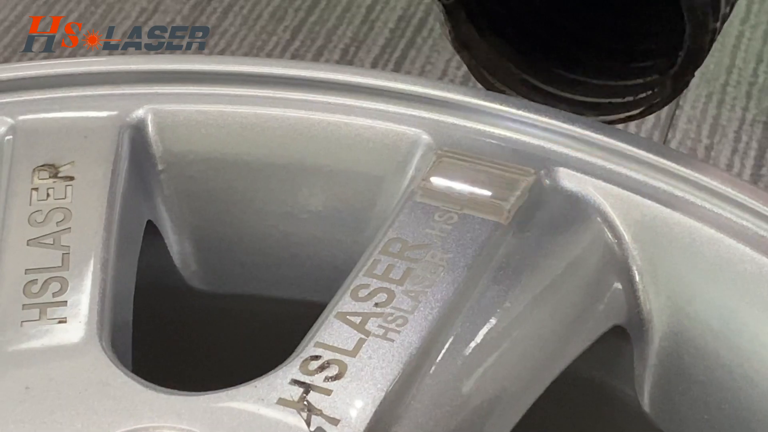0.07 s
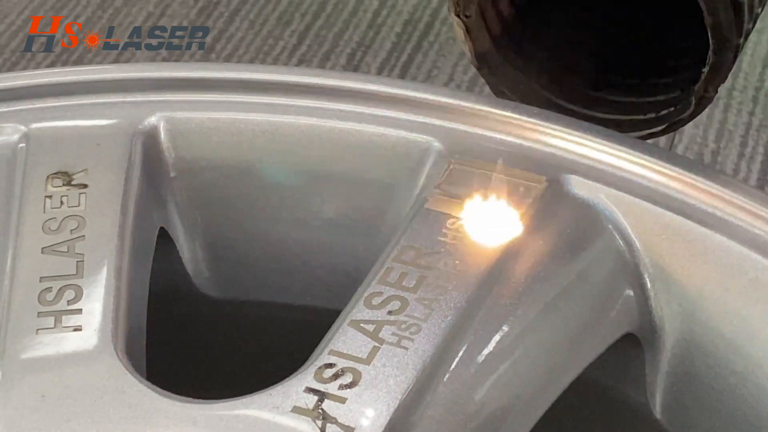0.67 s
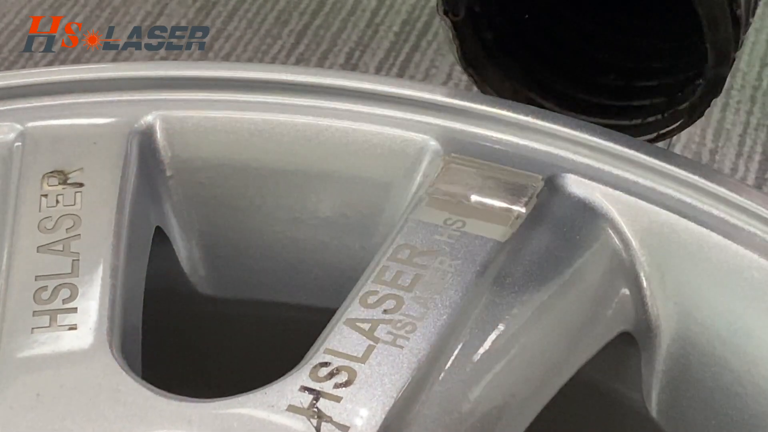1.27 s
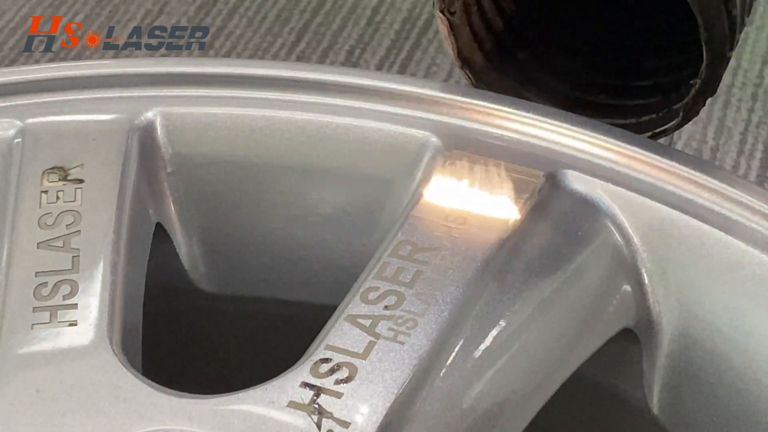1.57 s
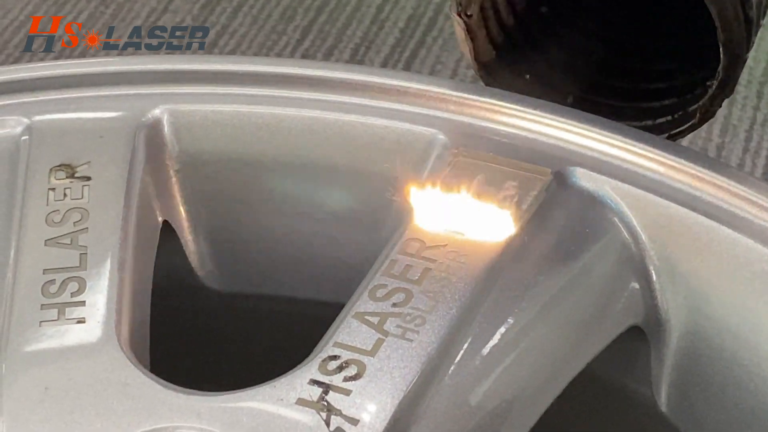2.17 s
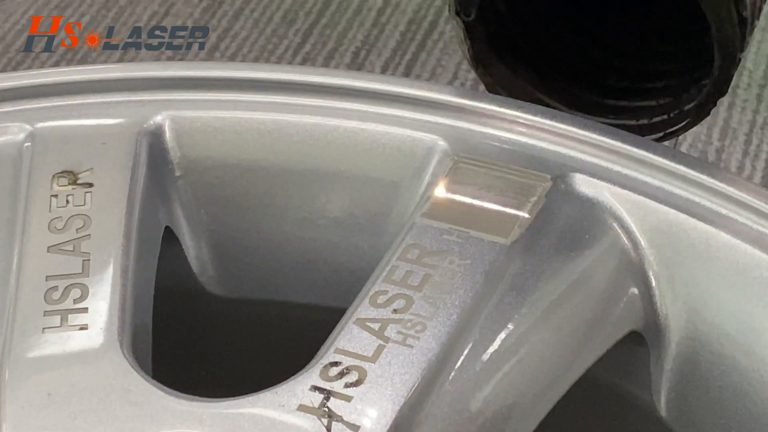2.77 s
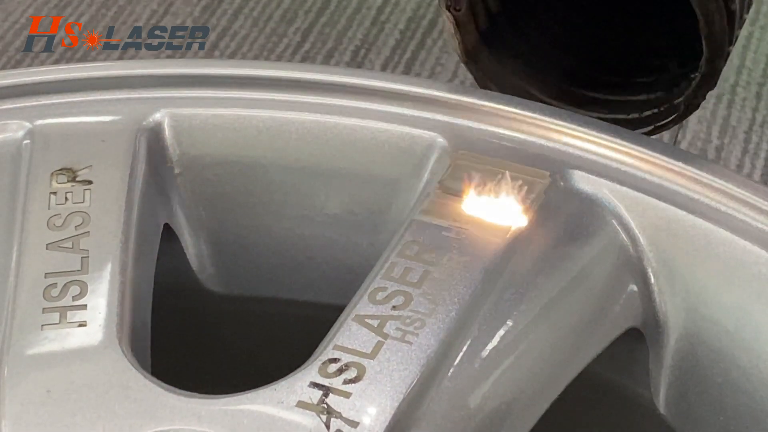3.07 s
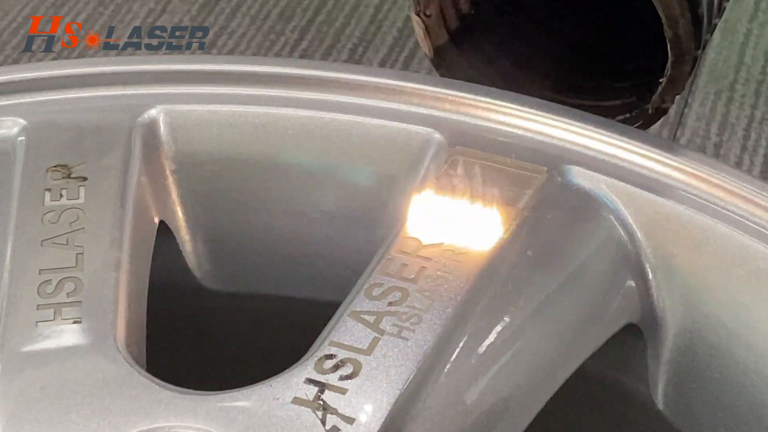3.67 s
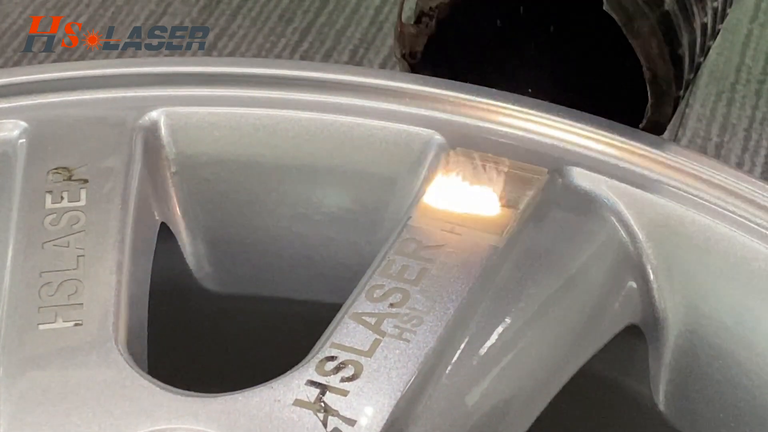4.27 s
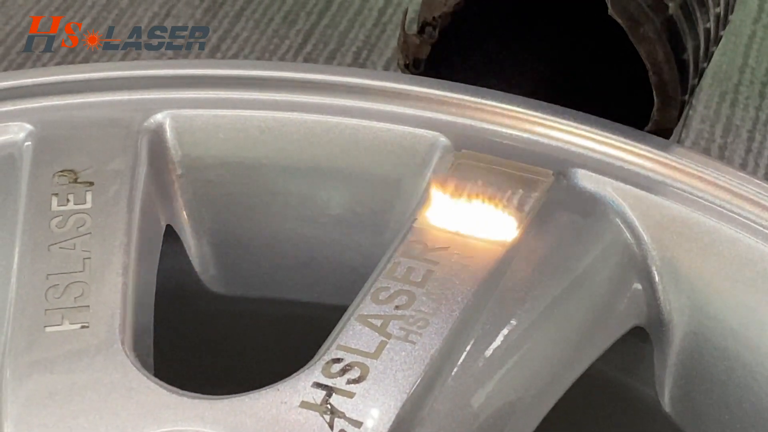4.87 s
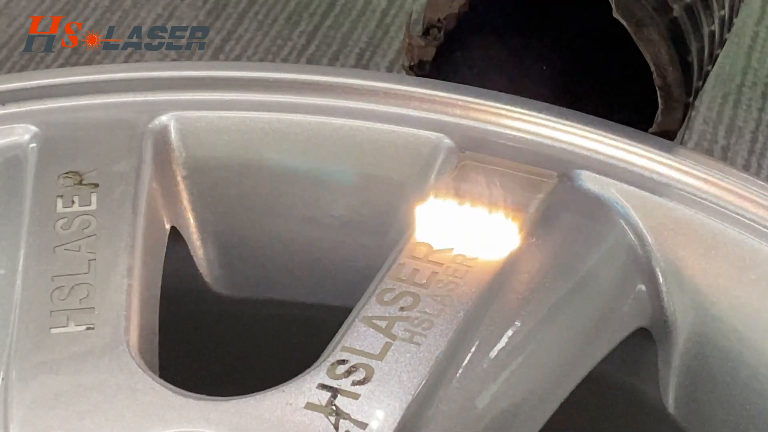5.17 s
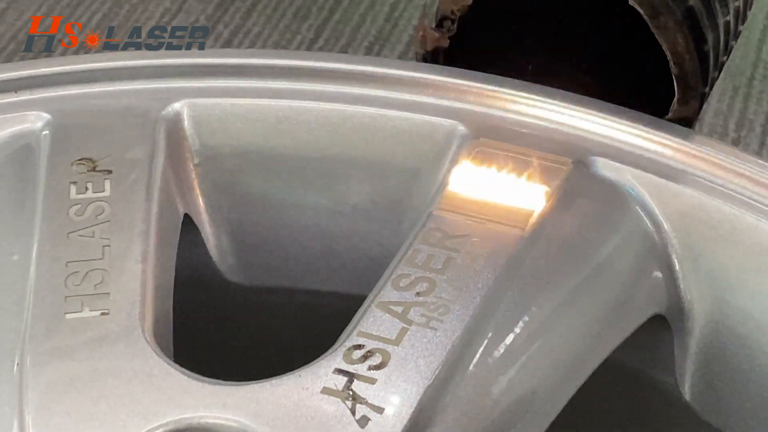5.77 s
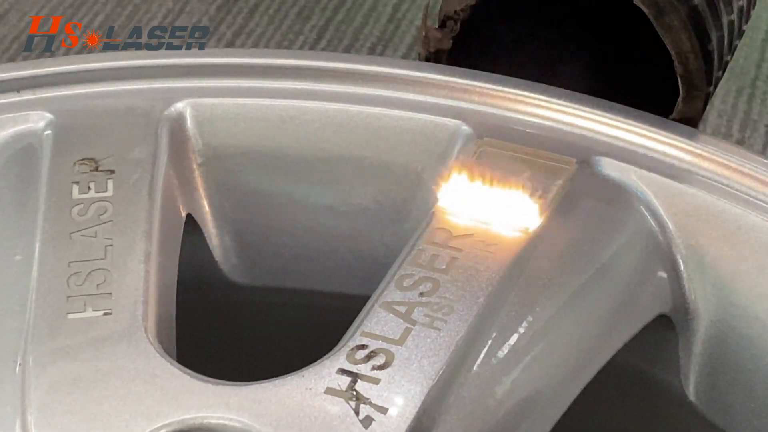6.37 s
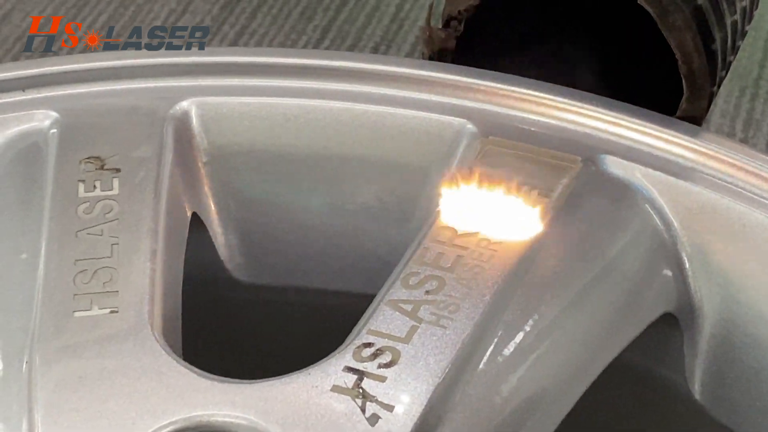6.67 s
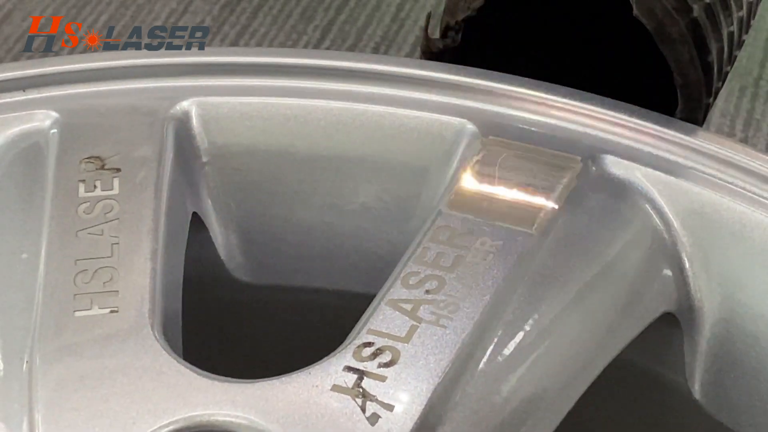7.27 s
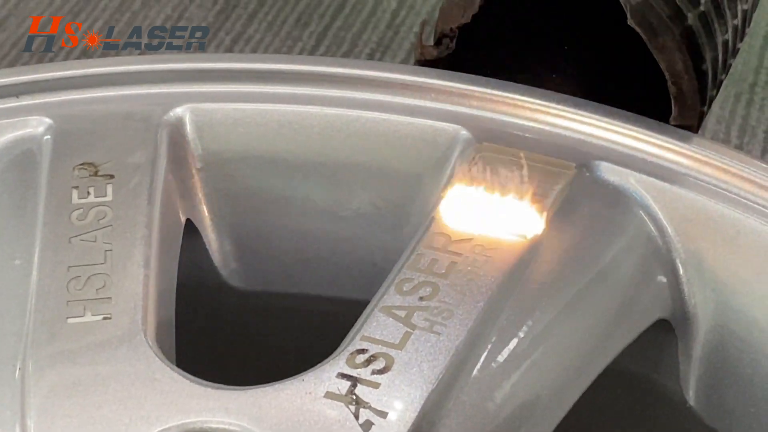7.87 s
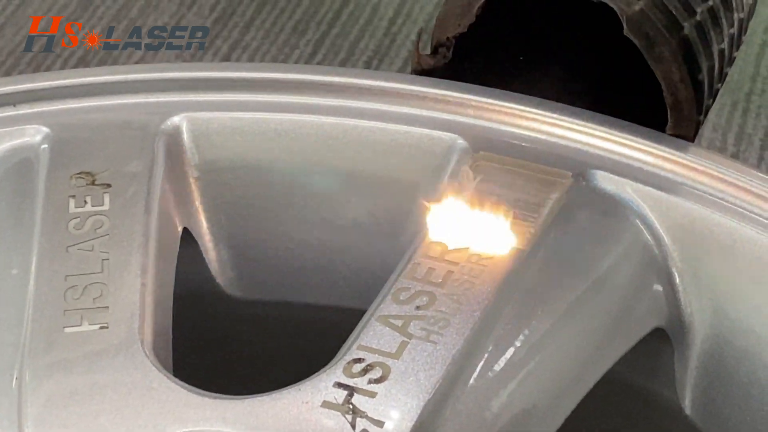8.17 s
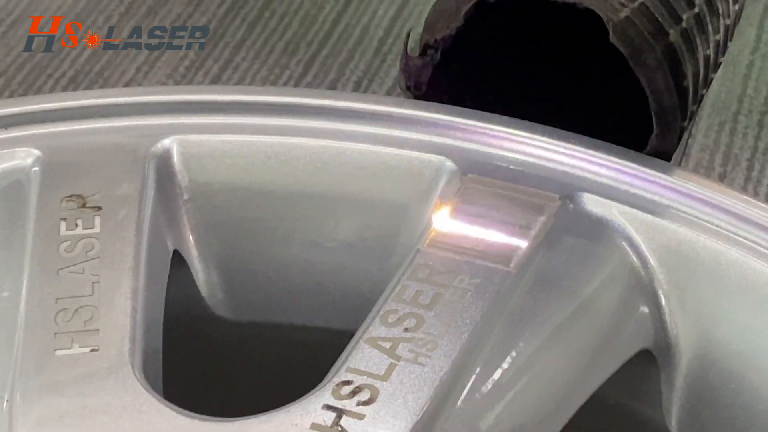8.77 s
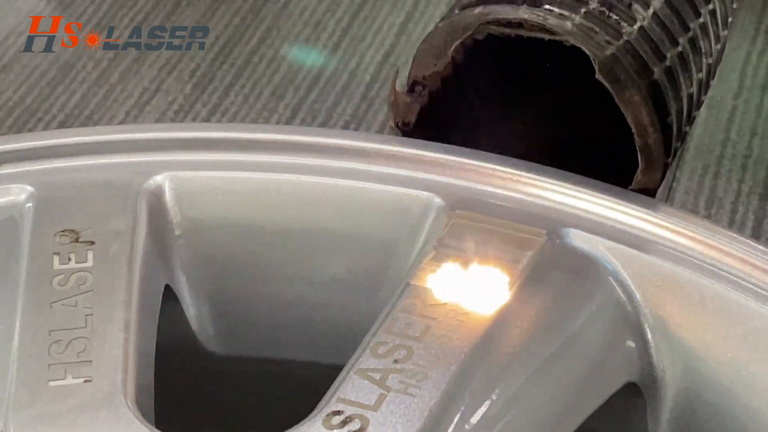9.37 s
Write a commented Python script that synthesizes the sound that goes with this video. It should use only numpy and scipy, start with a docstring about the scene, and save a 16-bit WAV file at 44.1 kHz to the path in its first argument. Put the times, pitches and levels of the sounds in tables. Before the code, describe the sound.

A pulsed laser grazes an alloy wheel spoke with thin, buzzing ticks, then bites into the coating with a harsh, gritty sizzle. It makes seven passes of about a second each, separated by quieter gaps with rapid ticking. Flakes snap off and small flares add low, fluttering puffs. The sound is close, in a workshop, with a fume extractor rushing faintly throughout.

```python
"""Buzzing ticks first: a pulsed laser grazes the edge of an alloy wheel spoke, close by in a workshop.
Then it bites and strips the coating in seven passes. A mirror swings the beam to and fro; each
crossing is a short burst of sizzle, so the passes buzz. Flakes pop, flares of the plume throb low,
a brief drone follows the fourth pass. A fume extractor runs behind."""
import sys
import numpy as np
from scipy import signal
from scipy.fft import rfft, irfft, next_fast_len
from scipy.io import wavfile
from scipy.ndimage import uniform_filter1d

SR = 44100
rng = np.random.default_rng(int(sys.argv[2]) if len(sys.argv) > 2 else 0)


def log_audio(samples):
    """Write samples as a 16-bit WAV file to the path given in sys.argv[1]."""
    # one column per channel
    frames = np.atleast_2d(samples).T
    # limit to full scale, then quantise
    limited = np.clip(frames, -1, 1)
    pcm = np.round(limited * 32767).astype(np.int16)
    wavfile.write(sys.argv[1], SR, pcm)


N = 415422
TIME_S = np.arange(N) / SR
SCAN_HZ = 54.03
ROAR_STRETCH, RUMBLE_STRETCH = 1.09, 1.01  # length relative to the throb

# Table levels are relative: filters and mix gains follow.
# spectra (frequency [Hz], level [dB])
EXTRACTOR_SPECTRUM = [(40, -50), (120, -26), (175, -13.5), (235, -32), (295, -3), (450, -9.5), (600, -3.5),
                      (900, 1.5), (1500, -14.5), (2300, -4.5), (3200, -17.5), (4500, -19.5), (10000, -18.5),
                      (15500, -22)]
TICK_SPECTRUM = [(100, -57), (220, -6), (400, 3.5), (900, -2), (1500, -5.5), (2500, -0.5), (3000, -6.5),
                 (3700, -2.5), (4600, -3.5), (8000, 2.5), (11500, 0), (14300, 9.5), (15800, 5)]
SIZZLE_SPECTRUM = [(120, -71), (300, -39.5), (900, 1), (1500, 1.5), (2200, 2), (3200, 2), (5000, 1),
                   (7500, 1), (9000, 7.5), (11500, -1.5), (14000, -1), (15500, 1)]
PUFF_SPECTRUM = [(100, -44), (210, -33.5), (320, -3), (430, -2), (600, 1.5), (900, -1.5), (1400, -8),
                 (2200, -8.5), (5000, -32)]
SPRAY_SPECTRUM = [(200, -54), (5000, -15), (8000, -9), (9200, -6), (10100, 1), (11000, -13), (12200, -23),
                  (14300, -10.5), (16000, -18)]
# stereo width of diffuse sound (frequency [Hz], side gain [dB])
SIDE_SPECTRUM = [(100, -4), (300, -2.5), (700, -11.5), (1300, -3), (2400, -24), (4500, -21), (8000, -13),
                 (15000, -24.5)]
# phase between the microphone ports (frequency [Hz], right lead [turns])
PORT_PHASE = [(0, 0), (7100, 0), (8500, .5), (12100, 1.5), (15900, 2.5)]
# drone envelope (time [s], level [dB])
DRONE_ENVELOPE = [(5.33, -73), (5.39, -70), (5.48, -61), (5.56, -62.5), (5.67, -53), (5.74, -59),
                  (5.8, -87)]
# mirror restarts, one per pass (time [s])
PASS_STARTS_S = [-.0139, 1.3168, 2.6290, 4.0339, 5.4755, 6.9357, 8.4331]
# beam on one edge (start [s], end [s], side [+-1], first level [dB], last level [dB], ring share [0-1])
EDGE_GRAZES = [(0, 0.37, 1, -57.5, -57.5, 0.66), (1.33, 1.45, 1, -66.5, -76, 0.3),
               (1.44, 1.496, 1, -55.5, -52, 0.14), (2.622, 2.757, 1, -81, -72, 0.02),
               (2.77, 2.845, 1, -65, -55, 0.1), (4.041, 4.107, -1, -64, -51.5, 0.23),
               (5.49, 5.585, -1, -65, -68, 0), (5.592, 5.712, -1, -62, -51, 0.23),
               (6.933, 7.112, 1, -73.5, -72, 0), (7.104, 7.448, 1, -61, -51.5, 0.1),
               (8.449, 8.573, -1, -68.5, -69, 0.1), (8.575, 8.913, -1, -56, -53.5, 0.23)]
# plume flares (time [s], half length [s], throb pitch [Hz], throb level [dB],
# roar pitch [Hz], roar level [dB], rumble level [dB])
PLUME_FLARES = [(0.371, 0.0062, 60, -35, 326, -49, -52), (0.477, 0.09, 314, -41, 495, -50, -64),
                (0.587, 0.054, 104, -46, 322, -52, -54), (1.556, 0.061, 253, -50, 330, -55, -59),
                (1.845, 0.21, 173, -65.5, 333, -85, -77), (1.982, 0.054, 87, -48.5, 373, -56, -55),
                (2.096, 0.085, 359, -58.5, 500, -50.5, -96), (2.922, 0.031, 200, -42, 344, -47, -70),
                (2.954, 0.051, 84, -49, 330, -67, -54), (3.16, 0.18, 186, -75.5, 328, -64.5, -71),
                (4.208, 0.038, 193, -50, 330, -72, -83), (4.44, 0.097, 224, -42, 345, -58, -62),
                (4.885, 0.065, 61, -53, 330, -85, -66), (5.063, 0.043, 65.4, -58, 330, -86, -80),
                (5.331, 0.057, 217, -34.5, 320, -49.5, -81), (5.79, 0.038, 75, -70, 614, -53, -61),
                (6.014, 0.04, 228, -60.5, 330, -72, -87), (6.08, 0.06, 115, -61, 330, -67, -70),
                (6.773, 0.11, 204, -51, 320, -49.5, -49), (7.622, 0.064, 101, -38.5, 175, -54.5, -43.5),
                (7.78, 0.1, 318, -48, 400, -48, -65), (8.126, 0.09, 159, -38, 323, -47.5, -41),
                (8.222, 0.076, 346, -44.5, 530, -47.5, -70), (9.317, 0.039, 183, -51, 425, -50, -76)]
# flakes bursting off (time [s], level [dB])
FLAKE_POPS = [(0.366, -22), (0.372, -21), (1.462, -27.5), (1.508, -27), (2.844, -28), (2.988, -22),
              (3.025, -31), (3.062, -31), (3.329, -31), (5.715, -17), (5.733, -18.5), (7.368, -23),
              (8.894, -28), (8.913, -23.5)]
# passing resonances of the burn (time [s], half length [s], centre [Hz], level [dB])
BURN_RASPS = [(0.462, 0.11, 3720, -46.5), (0.833, 0.04, 665, -60), (1.654, 0.14, 3780, -47.5),
              (2.28, 0.12, 4570, -50), (3.503, 0.25, 4200, -53.5), (4.542, 0.067, 1030, -53.5),
              (4.53, 0.15, 2000, -53.5), (5.013, 0.32, 5050, -49.5), (5.8, 0.053, 3050, -51.5),
              (6.135, 0.24, 990, -58.5), (7.845, 0.18, 2170, -55), (7.95, 0.3, 14800, -55),
              (9.23, 0.28, 14800, -47), (9.25, 0.097, 4570, -48.5)]
# beam biting the coating (start [s], end [s], attack [s], sizzle level [dB], sizzle trend [dB/s],
# puff level [dB], built-up spray level [dB])
COATING_BURNS = [(0.35, 0.376, 0.043, -44.5, 0, -45, -56), (0.399, 1.021, 0.05, -48.5, -4, -49.5, -53.5),
                 (1.459, 1.475, .014, -57, 0, -56, -57), (1.499, 2.472, .01, -49.5, -5, -54.5, -52.5),
                 (2.84, 3.922, 0.015, -52.5, 1.5, -52.5, -54.5), (4.099, 5.373, 0.024, -51, 1, -54.5, -52),
                 (5.7, 6.823, 0.0088, -49.5, -2, -57.5, -50), (7.15, 7.214, 0.041, -57, 6, -61, -48),
                 (7.31, 7.38, 0.031, -57.5, 0, -71, -62), (7.451, 8.274, 0.096, -48.5, 2, -50, -49),
                 (8.906, 8.943, 0.011, -54, 2, -49.5, -50), (8.965, 9.099, .1, -50, -8, -54, -50),
                 (9.131, 9.43, 0.1, -49, -13, -55.5, -45)]


def undb(db):
    """Decibels to gain."""
    return 10 ** (np.asarray(db) / 20)


def unit(x):
    """Scale to rms 1."""
    return x / np.sqrt(np.mean(x ** 2) + 1e-20)


def colour(x, points):
    """Minimum-phase filter through points (frequency [Hz], gain [dB])."""
    size = next_fast_len(x.shape[-1] + 8192)
    size += size % 2
    hz, db = np.transpose(points)
    log_gain = np.log(undb(np.interp(np.log(np.fft.rfftfreq(size, 1 / SR) + 1), np.log(hz), db)))
    cepstrum = irfft(log_gain)
    cepstrum[1:size // 2] *= 2
    cepstrum[size // 2 + 1:] = 0
    return irfft(rfft(x, size) * np.exp(rfft(cepstrum)))[..., :x.shape[-1]]


def walk(rate_hz):
    """Random values joined by lines, rms near 1."""
    knots = rng.standard_normal(int(N / SR * rate_hz) + 2)
    return np.interp(TIME_S * rate_hz, np.arange(len(knots)), knots) * np.sqrt(3 / 2)


def spread(mid, side):
    """Left and right of a diffuse sound."""
    return mid + colour(side, SIDE_SPECTRUM) * np.array([[1], [-1]])


def extractor(level_db=-68):
    """Steady rush of the fume hose, wavering a little."""
    mid, side = (unit(colour(rng.standard_normal(N), EXTRACTOR_SPECTRUM)) for _ in range(2))
    return spread(mid, undb(-5) * side) * undb(level_db + .5 * walk(8.5))


def drone():
    """Fluttering low tone: narrow noise near 205 Hz."""
    times_s, db = np.transpose(DRONE_ENVELOPE)
    spectrum = [(110, -28), (170, -6), (205, 7.5), (235, 0), (300, -7), (450, -51)]
    tone = unit(colour(rng.standard_normal(N), spectrum))
    return tone * undb(np.interp(TIME_S, times_s, db)) * (TIME_S > times_s[0]) * (TIME_S < times_s[-1])


def workshop(x, wheel_t60_s=0.036, room_t60_s=0.24):
    """Direct sound, quick reflections inside the wheel, faint room tail."""
    age_s = np.arange(SR // 2) / SR
    arrived = age_s > .0004
    response = 0
    for t60_s, db in ((wheel_t60_s, -12), (room_t60_s, -20)):
        echoes = rng.standard_normal((2, len(age_s))) * np.exp(-np.log(1000) * age_s / t60_s) * arrived
        response = response + undb(db) * echoes / np.sqrt(np.sum(echoes[0] ** 2))
    response = colour(response, [(150, -29.5), (500, 2), (3000, 6.5), (7000, 2.5), (10000, 5), (15000, 9)])
    wet = signal.fftconvolve(x[None], signal.hilbert(response), axes=1)[:, :N]
    # the moving spot keeps changing the echo paths
    path_turns = np.array([walk(SCAN_HZ / 2), walk(SCAN_HZ / 2)])
    mid, side = (wet * np.exp(2j * np.pi * path_turns)).real
    return x + spread(mid, undb(12) * side)


def mirror():
    """Beam position across the spoke, -1 to 1."""
    starts_s = np.array(PASS_STARTS_S)
    age_s = TIME_S - starts_s[np.searchsorted(starts_s, TIME_S) - 1]
    return np.sin(2 * np.pi * SCAN_HZ * age_s)


def surface(memory):
    """Noise that partly repeats: each swing meets nearly the same coating."""
    period = round(SR / SCAN_HZ)
    swings = rng.standard_normal((N // period + 1, period))
    return unit(signal.lfilter([1], [1, -memory], swings, axis=0).ravel()[:N])


def bite(start_s, end_s, attack_s, cut_s=.005):
    """Gate of one burn, with linear ramps."""
    return np.clip(np.minimum((TIME_S - start_s) / attack_s, (end_s - TIME_S) / cut_s) + .5, 0, 1)


def burn_gate():
    """Sum of all burn gates."""
    return sum(bite(*burn[:3]) for burn in COATING_BURNS)


def swells(source, table, width_oct):
    """Gaussian swells of a source during burns, each through its own resonance."""
    out, burning = np.zeros(N), burn_gate()
    for time_s, half_s, centre_hz, db in table:
        near = np.abs(TIME_S - time_s) < 3 * half_s
        swell = np.exp(-((TIME_S[near] - time_s) / half_s) ** 2) * burning[near]
        hz = np.fft.rfftfreq(len(swell), 1 / SR) + 1
        sigma_oct = width_oct + 14 / centre_hz  # low resonances are broader
        resonance = np.exp(-.5 * (np.log2(hz / centre_hz) / sigma_oct) ** 2)
        band = irfft(rfft(source[near] * swell) * resonance, len(swell))
        out[near] += undb(db) * unit(band) * np.sqrt(np.mean(swell ** 2))
    return out


def flares(on_spoke, lopsided=0.37, unrest=0.74, sway_db=-7):
    """The flaring plume puffs at each crossing: a throb over a roar and a rumble."""
    ignition = np.maximum(np.gradient(on_spoke), 0) * (1 + lopsided * np.sin(2 * np.pi * SCAN_HZ * TIME_S))
    strength = undb(1.3 * walk(90))
    turbulence = unit(colour(surface(memory=0.83), [(500, -1), (1500, -35)])) * on_spoke
    drive = unit(ignition) * strength + unrest * turbulence
    throbs, roars, rumbles = [], [], []
    rumble_hz = 67
    for time_s, half_s, throb_hz, throb_db, roar_hz, roar_db, rumble_db in PLUME_FLARES:
        throbs.append((time_s, half_s, throb_hz, throb_db))
        roars.append((time_s, half_s * ROAR_STRETCH, roar_hz, roar_db))
        rumbles.append((time_s, half_s * RUMBLE_STRETCH, rumble_hz, rumble_db))
    flame = swells(drive, throbs, width_oct=0.16) + swells(drive, roars, width_oct=0.15)
    flame += swells(turbulence, rumbles, width_oct=0.51)
    sway = undb(sway_db) * walk(14) * signal.hilbert(flame).imag  # the flame leans left and right
    return flame + sway * np.array([[1], [-1]])


def edge_ticks(position, edge=.67, tick_width=0.0047, crackle_width=0.082, return_db=2):
    """Only the rim reacts: the beam ticks going out and, harder, coming back."""
    ticks, ring_share = np.zeros(N), np.zeros(N)
    returning = position * np.gradient(position) < 0
    strength = undb(return_db * returning + 0.74 * walk(110))
    for start_s, end_s, side, first_db, last_db, share in EDGE_GRAZES:
        during = (TIME_S >= start_s) & (TIME_S < end_s)
        from_rim = np.abs(position[during] - side * edge)
        fizz = (.17 * np.exp(-from_rim / crackle_width) + 0.031) * rng.standard_normal(during.sum())
        touch = (np.exp(-from_rim / tick_width) + fizz) * strength[during]
        ticks[during] += unit(touch) * undb(np.linspace(first_db, last_db, during.sum()))
        ring_share[during] = share
    ring_spectrum = [(1500, -11), (2450, -4), (3000, -8), (3450, 9), (3900, 8), (4400, -5), (6000, -16)]
    return colour(ticks, TICK_SPECTRUM) + colour(ticks * ring_share, ring_spectrum)


def pops(decay_s=0.001):
    """Single flakes burst off with a snap."""
    out, age_s = np.zeros(N), np.arange(SR // 100) / SR
    for time_s, db in FLAKE_POPS:
        snap = rng.standard_normal(len(age_s)) * np.exp(-age_s / decay_s)
        out[int(time_s * SR):][:len(age_s)] += undb(db) * snap / np.abs(snap).max()
    spectrum = [(100, -79), (250, 14), (600, 13), (2500, 4.5), (7000, -7), (15000, 0)]
    return undb(-9.5) * colour(out, spectrum)


def burn_gains(puff_db_per_s=-7, flare_puff_db=-3.5, spray_lag_db=-14.5, spray_build_s=0.24):
    """Sizzle follows its trend; puff thins with the coating, swells in flares; spray builds with heat."""
    sizzle, puff, spray, flaring = np.zeros((4, N))
    for start_s, end_s, attack_s, sizzle_db, sizzle_db_per_s, puff_db, spray_db in COATING_BURNS:
        gate = bite(start_s, end_s, attack_s)
        on = gate > 0
        age_s, from_middle_s = TIME_S[on] - start_s, TIME_S[on] - (start_s + end_s) / 2
        sizzle[on] += gate[on] * undb(sizzle_db + sizzle_db_per_s * from_middle_s)
        puff[on] += gate[on] * undb(puff_db + puff_db_per_s * from_middle_s)
        spray[on] += gate[on] * undb(spray_db + spray_lag_db * np.exp(-age_s / spray_build_s))
    for time_s, half_s, *_, roar_db, _ in PLUME_FLARES:
        from_peak = np.minimum(np.abs(TIME_S - time_s) / (half_s * ROAR_STRETCH), 10)
        flaring += undb(roar_db + flare_puff_db) * np.exp(-from_peak ** 2)
    return sizzle, np.hypot(puff, flaring * burn_gate()), spray


def ablation(exposure, afterglow=0.15, patchy_db=1.85):
    """Each crossing boils off coating: gritty sizzle, rasp, plume puff, fine high spray."""
    sizzle_gain, puff_gain, spray_gain = burn_gains()
    burn = (exposure + afterglow) * undb(0.44 * walk(110))
    # thick patches flash at the same place each swing
    patches_db = patchy_db * unit(uniform_filter1d(surface(memory=.995), size=60))
    grit = undb(.5 * patches_db + 1.6 * walk(2500))
    sizzle = unit(colour(surface(memory=0.45) * burn * grit, SIZZLE_SPECTRUM))
    rasp = swells(surface(memory=0.38) * burn * grit, BURN_RASPS, width_oct=0.36)
    puff = unit(colour(surface(memory=0.827) * burn * undb(patches_db), PUFF_SPECTRUM))
    spray = unit(colour(surface(memory=0.086) * burn * undb(2.3 * walk(1800)), SPRAY_SPECTRUM))
    return (undb(3) * sizzle * sizzle_gain + undb(-2.5) * rasp
            + undb(-1.5) * puff * puff_gain + undb(2.5) * spray * spray_gain)


def scene():
    """Scanned beam on the spoke, plume, drone and extractor, in stereo."""
    position = mirror()
    on_spoke = .5 + .5 * np.tanh((.7 - np.abs(position)) / 0.022)
    forward = np.gradient(position) > 0
    imbalance_db = 0.93 * walk(1.923) * (2 * forward - 0.5)  # the two directions bite unequally
    laser = ablation(on_spoke * undb(imbalance_db)) + pops()
    ticks = edge_ticks(position)
    # the rim stays in place: half the ticking bypasses the echoes
    return workshop(laser + ticks / 2) + ticks / 2 + flares(on_spoke) + drone() + extractor()


def record(dry, cutoff_hz=15850):
    """The microphone ports drift out of phase above 7 kHz; a steep low-pass cuts the top."""
    hz, turns = np.transpose(PORT_PHASE)
    lead = np.exp(2j * np.pi * np.interp(np.fft.rfftfreq(N, 1 / SR), hz, turns))
    ports = np.array([dry[0], irfft(rfft(dry[1]) * lead, N)])
    return signal.sosfilt(signal.ellip(10, .2, 80, cutoff_hz, fs=SR, output="sos"), ports)


dry = scene()
out = record(dry)
log_audio(out)
```